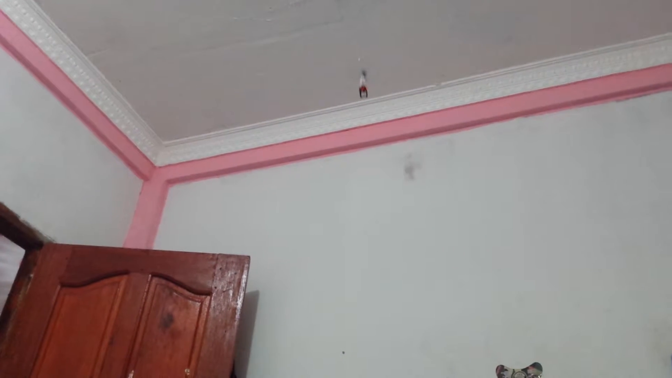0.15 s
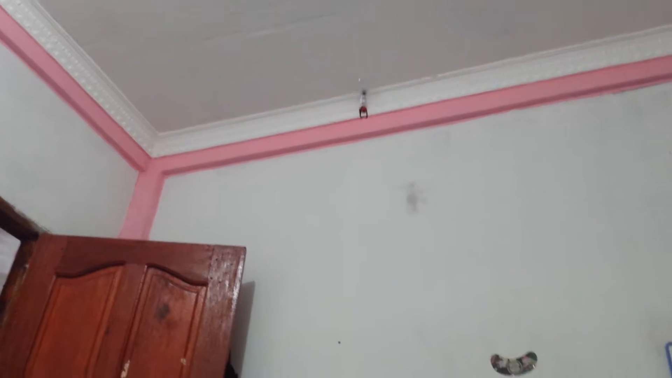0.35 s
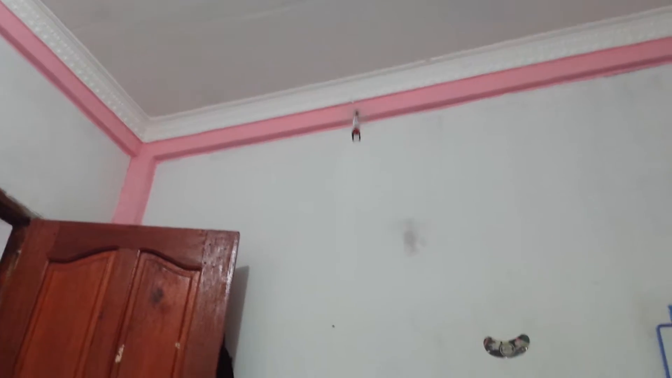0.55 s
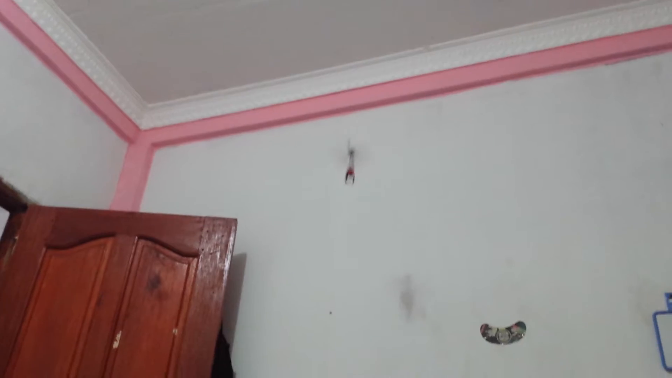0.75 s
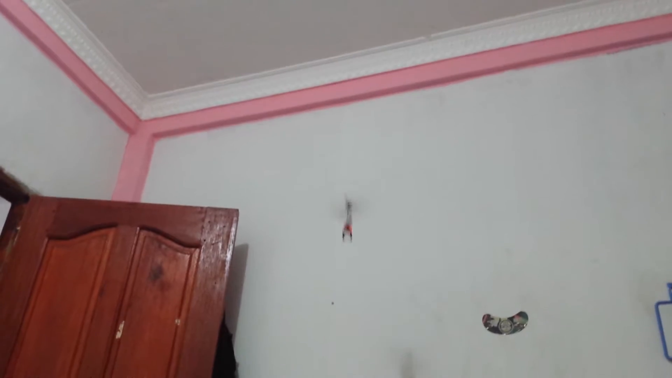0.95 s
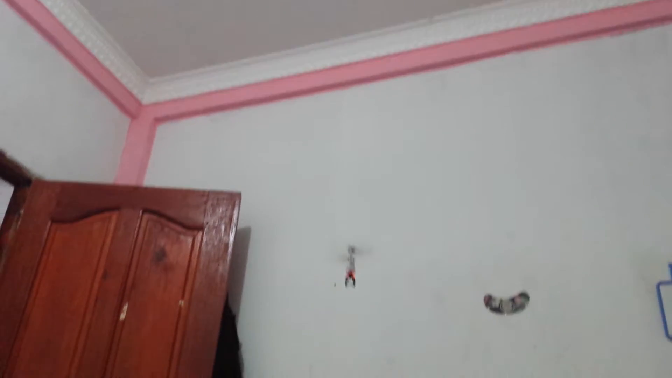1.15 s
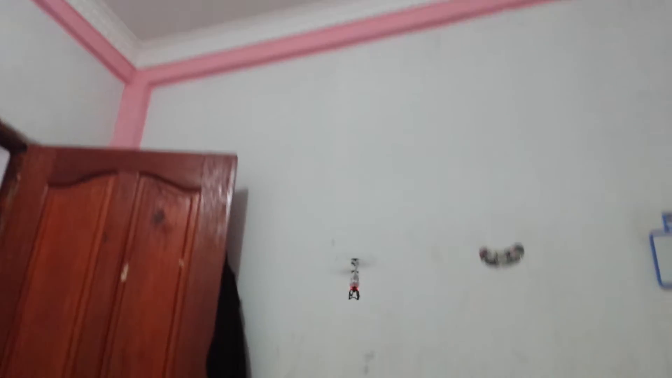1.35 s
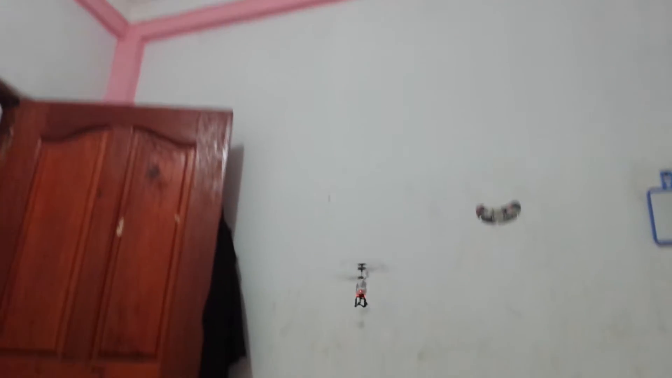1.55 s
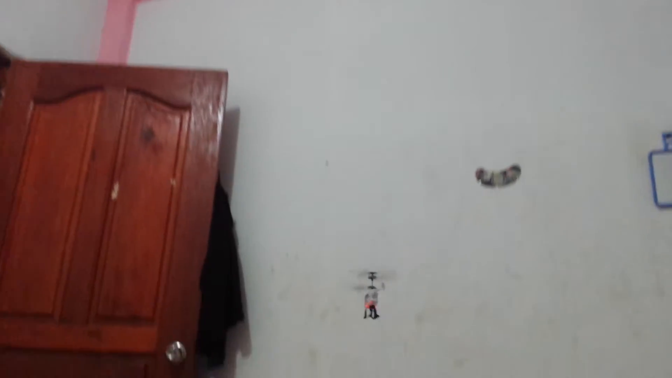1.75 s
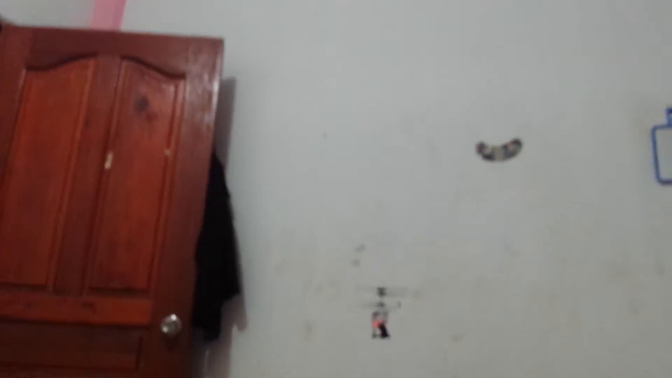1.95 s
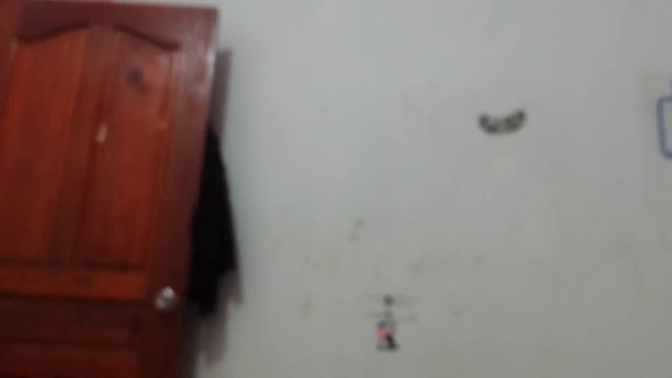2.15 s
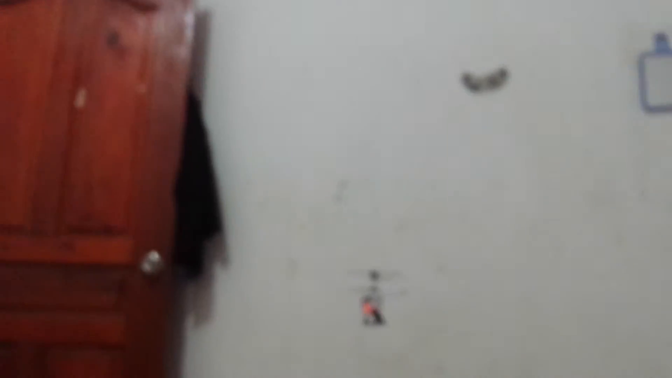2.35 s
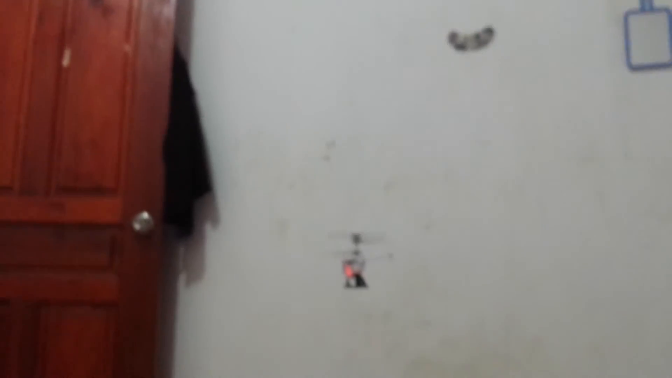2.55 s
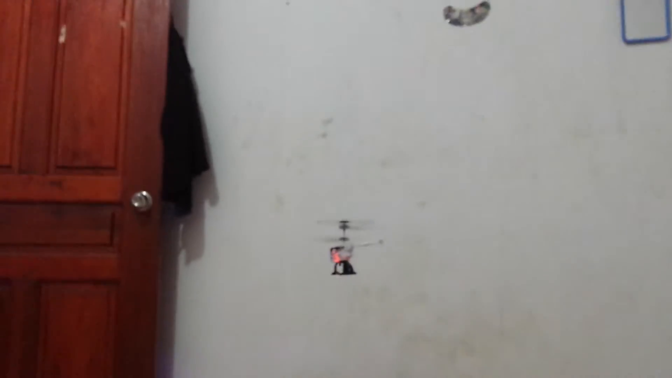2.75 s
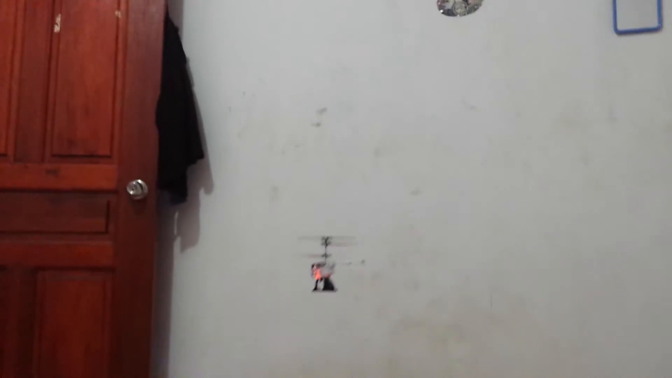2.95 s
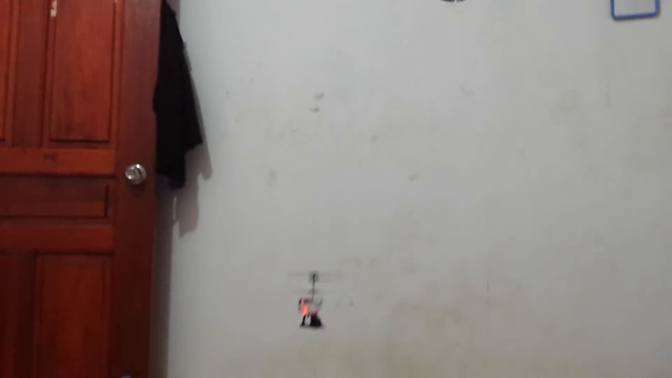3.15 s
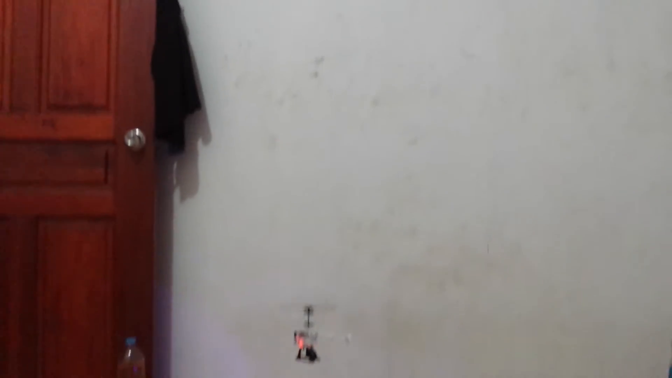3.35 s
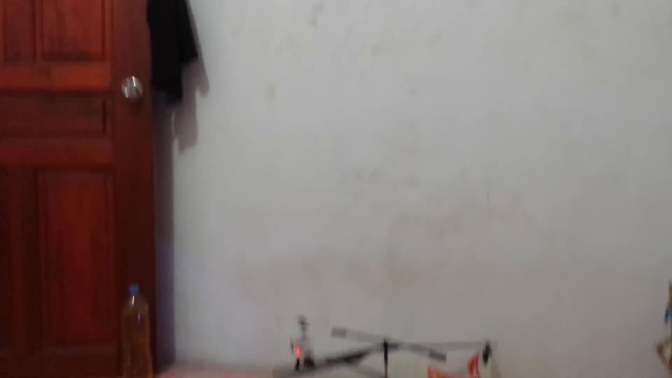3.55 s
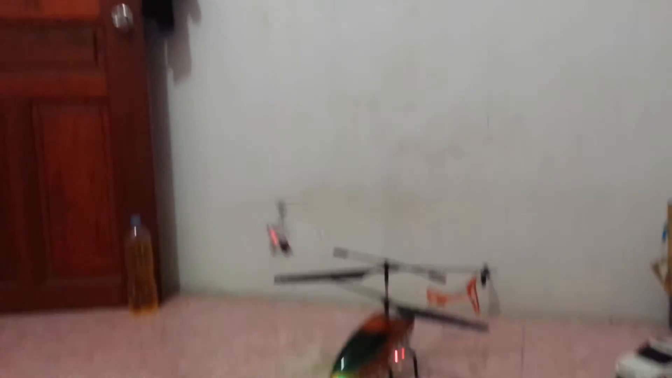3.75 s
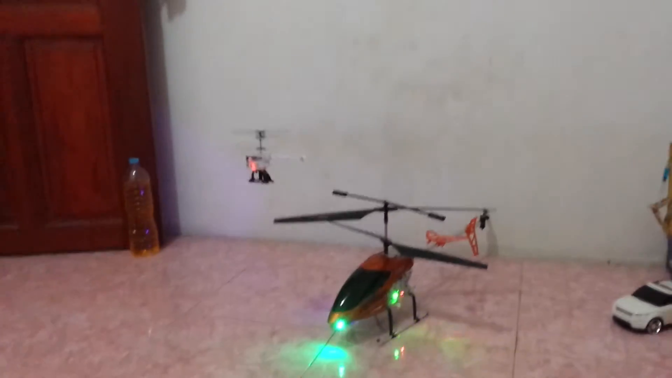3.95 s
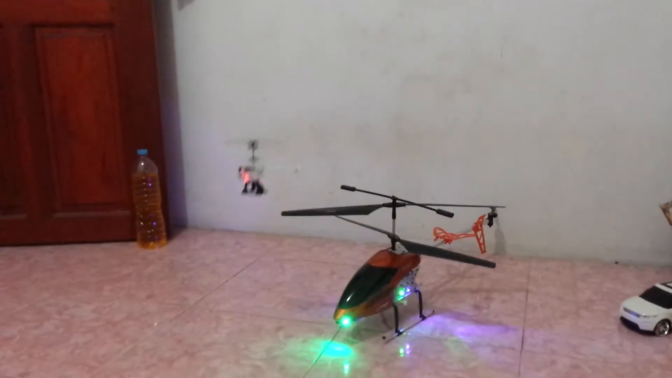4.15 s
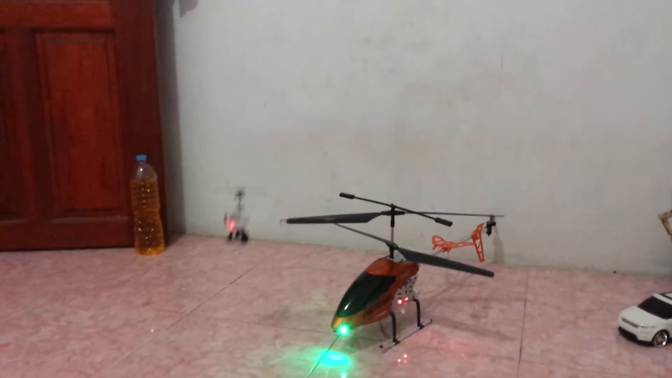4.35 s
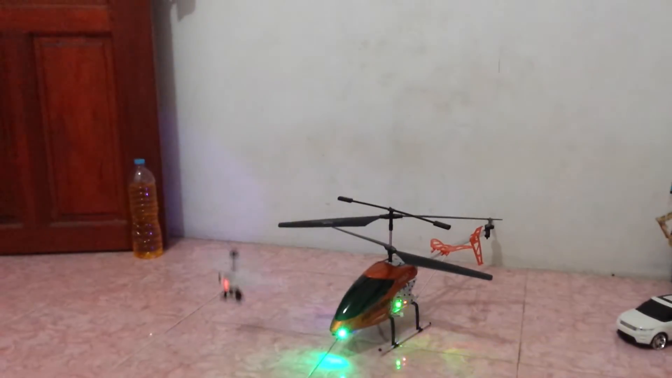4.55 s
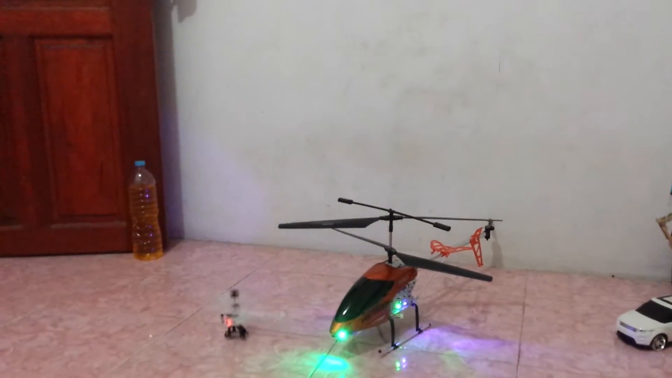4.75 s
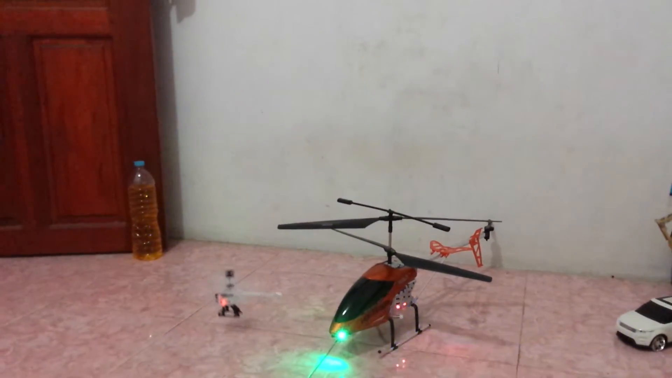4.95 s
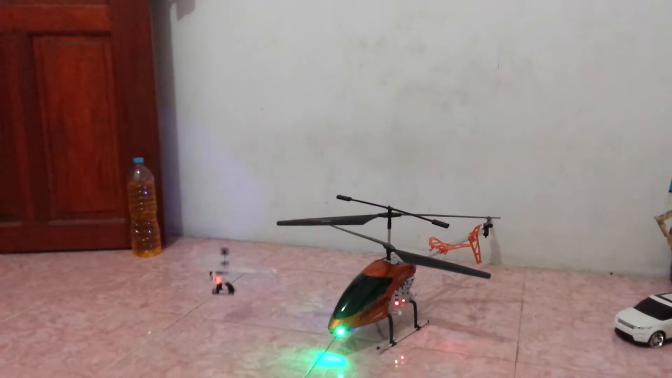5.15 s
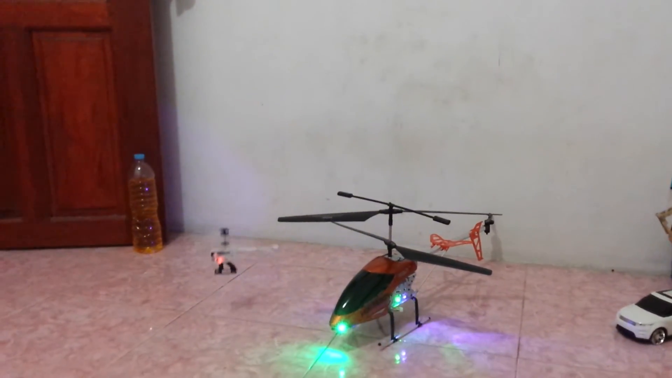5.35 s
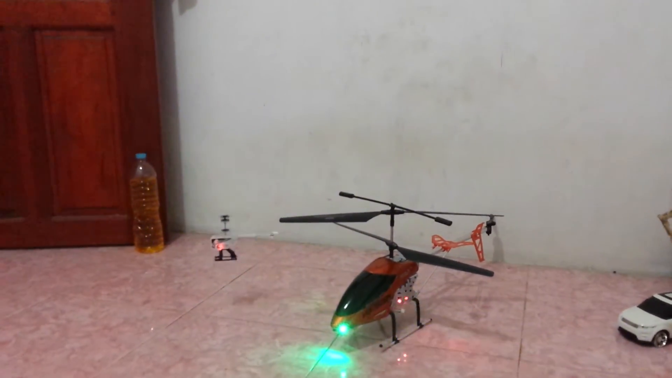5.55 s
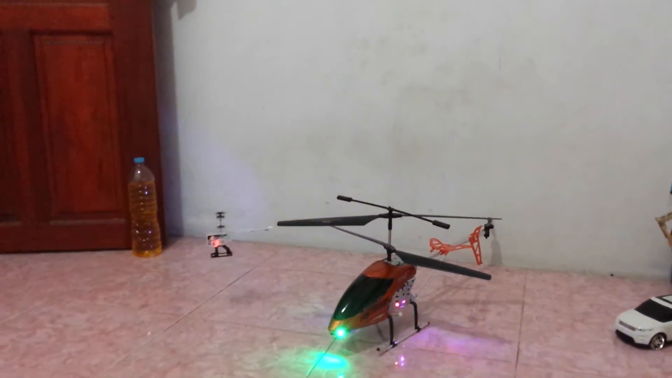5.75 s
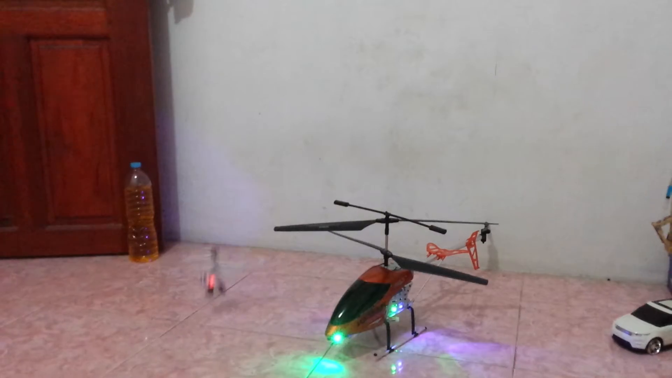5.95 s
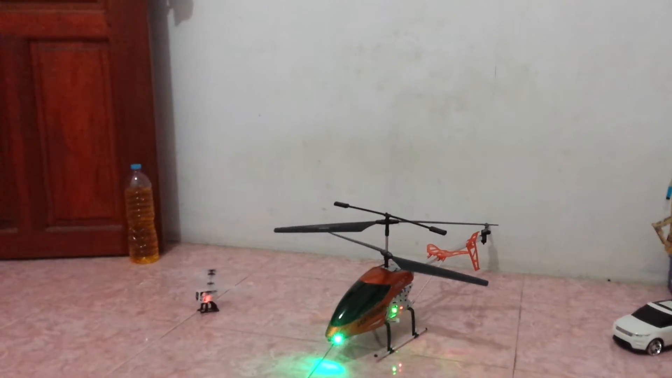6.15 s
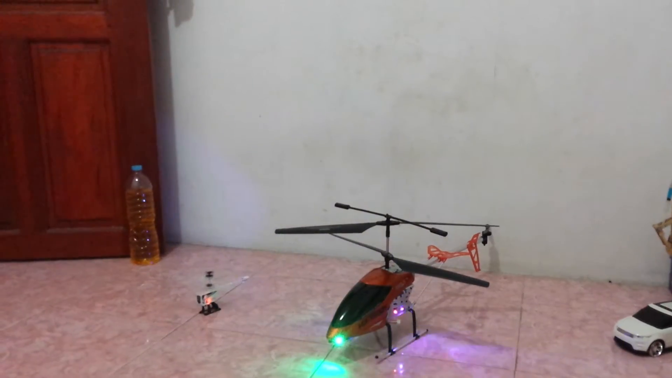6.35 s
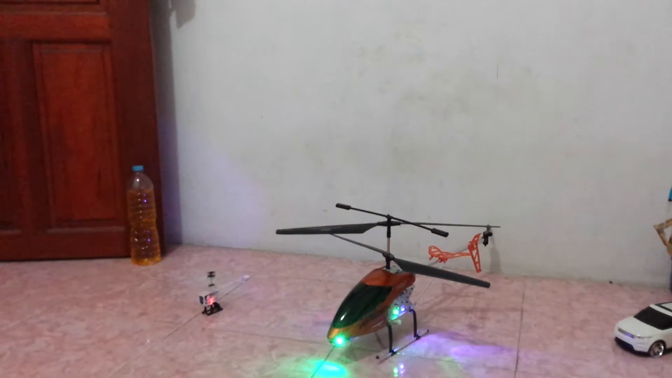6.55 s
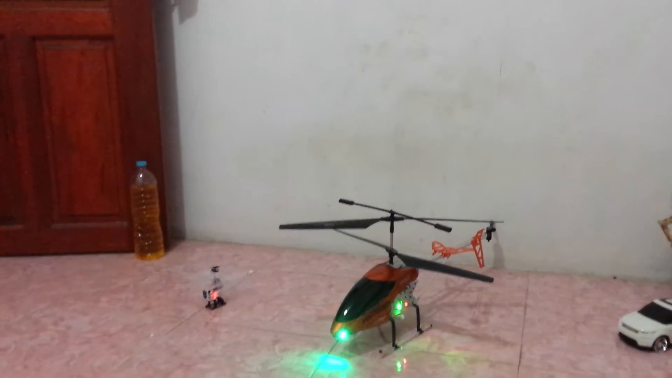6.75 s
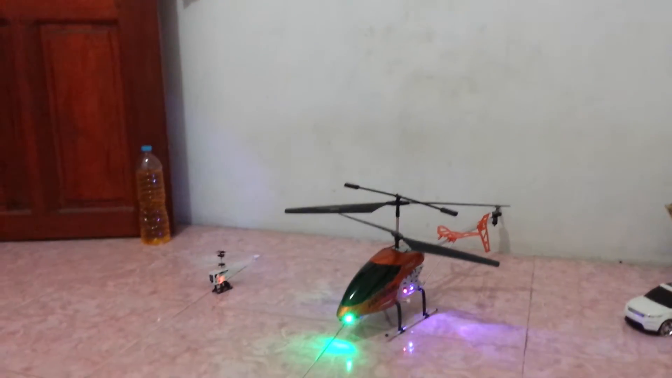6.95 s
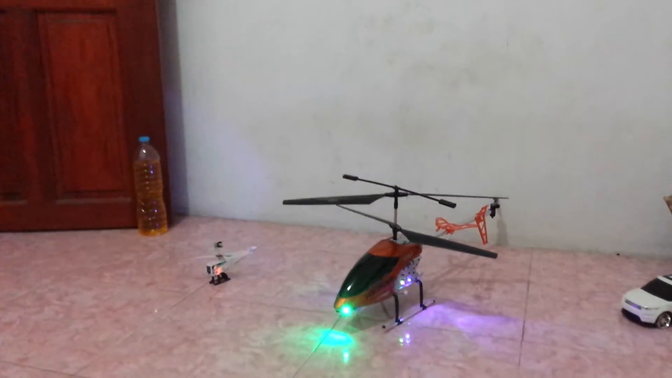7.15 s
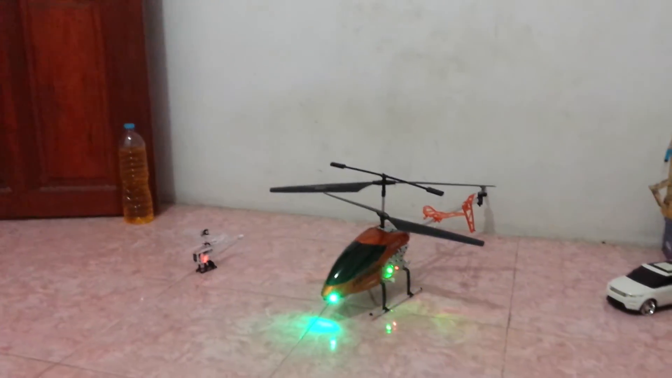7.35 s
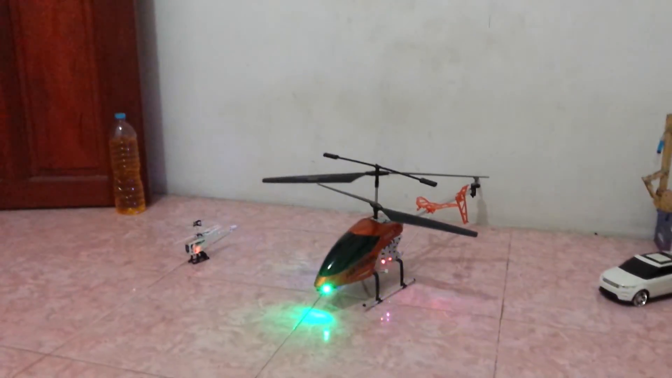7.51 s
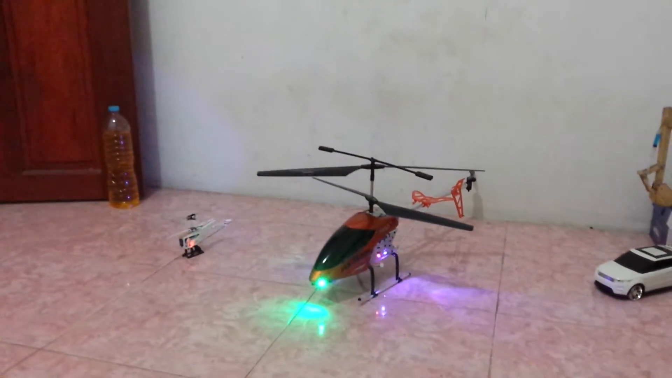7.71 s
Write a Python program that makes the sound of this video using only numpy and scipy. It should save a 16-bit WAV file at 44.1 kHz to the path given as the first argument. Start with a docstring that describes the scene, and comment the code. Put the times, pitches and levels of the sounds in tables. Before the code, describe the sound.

In a small, echoing tiled room, a tiny electric toy helicopter makes a dense, bright gear rattle with two wavering high whines and a faint blade hum. The pitch rises, sags, then rises again before the motor cuts. Skids clack sharply on tile at about six seconds. A thin whirr slows and fades while a distant engine grows outside. A plain stereo microphone in the room hears it all, with soft pings behind.

```python
"""A tiny toy helicopter with two rotors on one axis flies round a tiled room: gear teeth rattle its plastic body,
each gear mesh sings a gliding whine, and the blades hum over stirred air, all made from clicks, sines and noise.
A soft ping and a low drone come from the house along the way, and a distant engine starts to swell outside.
The motors are cut to a tick-over and the skids clack on the tiles; another soft ping sounds as
the motors whirr down under the engine. A two-port microphone with a limiter listens."""
import sys
import numpy as np
from scipy import signal
from scipy.fft import rfft, irfft, next_fast_len
from scipy.io import wavfile
from scipy.ndimage import uniform_filter1d, minimum_filter1d, map_coordinates

SR = 44100
rng = np.random.default_rng(int(sys.argv[2]) if len(sys.argv) > 2 else 0)


def generate_wav(signal):
    """Clip the signal to [-1, 1] and save it as 16-bit WAV at the path in sys.argv[1]."""
    frames = np.transpose(np.atleast_2d(signal))
    scaled = np.clip(frames, -1, 1) * 32767
    pcm = np.round(scaled).astype(np.int16)
    wavfile.write(sys.argv[1], SR, pcm)


N = 343083
T = np.arange(N) / SR  # time in seconds
DRIVE_HZ = 317  # pulse rate of the motor drive
TEETH_PER_TURN = 53  # teeth that pass in one rotor turn


def undb(db):
    """Turn decibels into a gain."""
    return 10 ** (np.asarray(db) / 20)


def curves(table):
    """Join each column of a table by straight lines in time, holding the end values."""
    s, *columns = np.transpose(table)
    return [np.interp(T, s, c) for c in columns]


def at(points, hz):
    """Read (Hz, value) points along a log-frequency axis."""
    f, value = np.transpose(points)
    return np.interp(np.log(hz + 1), np.log(f), value)


def unit(x):
    """Scale to an rms of 1."""
    return x / np.sqrt(np.mean(x ** 2))


def shape(x, gain):
    """Filter by a gain that is a function of frequency."""
    size = next_fast_len(N + 8192)
    f = np.arange(size // 2 + 1) * SR / size
    return irfft(rfft(x, size) * gain(f), size)[..., :N]


def below(f, hz, order=8):
    """Gain of a low-pass; one minus it is the matching high-pass."""
    return 1 / (1 + (f / hz) ** order)


def wander(hz):
    """Smooth random drift with spread 1, mostly slower than hz."""
    return unit(shape(rng.standard_normal(N), lambda f: below(f, hz, order=4)))


# How long the tiled room rings. Each row: frequency in Hz, time to fade by 60 dB in seconds.
ROOM_FADE = [(150, 0.75), (1000, 0.63), (3000, 0.6), (7000, 0.6), (14000, 0.66)]


def room(x, wet_db, width=1.):
    """Direct sound plus the room's noise-like tail, which changes as things move; alike at both ports in the bass."""
    hop, size = SR // 3, 2 ** 16  # each stretch of sound gets a fresh tail
    window = np.sin(np.pi * np.arange(2 * hop) / (2 * hop))
    padded, wet = np.pad(x, (hop, size)), np.zeros((2, N + hop + size))
    f = np.fft.rfftfreq(256, 1 / SR)[:, None]
    s = np.arange(SR * 3 // 4 // 128) * 128 / SR
    onset = np.clip((s - .002) / 0.0052, 0, 1)
    decay = undb(-60 * s / at(ROOM_FADE, f)) * onset
    for i in range(0, N + hop, hop):
        real, imaginary = rng.standard_normal((2, 2, *decay.shape))
        mid, side = decay * (real + 1j * imaginary)
        side = side * np.minimum(width * f / 800, 1)
        tail = signal.istft(np.array([mid + side, mid - side]))[1]
        tail = tail / np.sqrt(np.sum(tail ** 2) / 2)
        wet[:, i:i + size] += irfft(rfft(window * padded[i:i + 2 * hop], size) * rfft(tail, size))
    return (x + undb(wet_db) * wet[:, hop:hop + N]) / np.hypot(1, undb(wet_db))


def tooth_clicks(hz, scatter_db=4.5, late=0.305, throb_db=2.0):
    """One click a tooth, uneven in size and timing (late: spread in teeth), harder on each motor drive pulse."""
    teeth = np.cumsum(hz) / SR
    k = np.arange(2, int(teeth[-1]) - 2)
    chance = rng.standard_normal((len(k), 2))
    place = np.interp(k + late * chance[:, 0], teeth, np.arange(N))
    throb = throb_db * np.sin(2 * np.pi * DRIVE_HZ * place / SR)
    size = undb(scatter_db * np.minimum(chance[:, 1], 2) + throb)
    # spread each click over 8 samples so that it can fall between samples
    taps = place.astype(int)[:, None] + np.arange(-3, 5)
    weights = size[:, None] * np.sinc(taps - place[:, None])
    return np.bincount(np.clip(taps, 0, N - 1).ravel(), weights.ravel(), N)


def body_bands(clicks, colour):
    """Clicks ringing the plastic, split into canopy (low), motor (middle) and frame (high) bands of rms 1."""
    ring = shape(clicks, lambda f: undb(at(colour, f)) * (1 - below(f, 1040)))
    low = shape(ring, lambda f: below(f, 4470, order=16))
    under = shape(ring, lambda f: below(f, 7080, order=24))
    return unit(low), unit(under - low), unit(ring - under)


# Speed of the upper rotor's gears. Each row: time in seconds, tooth rate in Hz.
UPPER_SPEED = [(0.0, 2699), (0.3, 2699), (0.6, 2668), (0.84, 2688), (1.0, 2825), (1.1, 2875), (1.25, 2904),
               (2.0, 2847), (2.3, 2915), (2.47, 2910), (2.93, 2666), (3.6, 2579), (4.0, 2594), (4.48, 2563),
               (4.82, 2670), (5.35, 2716), (5.65, 2714), (5.9, 2668)]
# Speed of the lower rotor's gears. Each row: time in seconds, tooth rate in Hz.
LOWER_SPEED = [(0.3, 2596), (0.78, 2648), (1.08, 2866), (1.7, 2998), (2.05, 3037), (2.36, 3124),
               (2.94, 2748), (3.1, 2679), (3.4, 2645), (3.72, 2654), (4.03, 2728), (4.45, 2739),
               (4.8, 2914), (5.15, 2979), (5.58, 3001), (5.9, 2918)]
HOVER_HZ, CLIMB_HZ = 2583, 3047  # lower tooth rate at effort 0 and at effort 1


def effort():
    """How hard the motors work, read from the lower gear speed: 0 at hover, 1 in a climb."""
    return (curves(LOWER_SPEED)[0] - HOVER_HZ) / (CLIMB_HZ - HOVER_HZ)


# Tooth rattle along the flight path. Each row: time in seconds, level in dB before the room,
# lean to the left in dB (flight() centres and softens it).
RATTLE_PATH = [(0.0, -17.5, -4.5), (0.22, -21, -4), (1.25, -19.5, -3), (2.15, -19.5, -4.5),
               (2.38, -23, -6.5), (2.65, -22, -5.5), (3.65, -22.6, -6.5), (3.85, -20, -5.5),
               (5.8, -20.5, -5), (5.97, -21, -5.5), (6.05, -23.5, -4.5)]
# Extra gain as the rattle stops. Each row: time in seconds, gain in dB.
RATTLE_ENDING = [(6.09, -1.5), (6.2, -2.5), (6.4, -25)]
# How the body rings in flight, before its bands are levelled. Each row: frequency in Hz, gain in dB.
BODY_COLOUR = [(710, -62), (1200, -29), (1460, -26.5), (1880, -13), (2430, -8.5), (2620, -14), (2950, -8),
               (3900, -10), (4240, -8.5), (5550, -3), (7020, 1), (7900, 2.5), (10200, -11.5),
               (14400, -20.5), (15500, -24)]
# The frame's treble and its sharp resonance carry best when the helicopter is low. Each row: time in
# seconds, frame band against the rattle level in dB, resonance against that band in dB before a trim.
FRAME_CARRY = [(0, 1.7, -3), (2.4, 1.5, -17), (2.9, 3.5, -3.5), (5.6, 2, -9.5), (5.92, -2, -6)]
CANOPY_DB, CANOPY_EFFORT_DB = -3.0, -3  # canopy band against the rattle level at hover, change at effort 1


def rattle(follow=.6, ring_hz=7800, ring_width_hz=350):
    """Loose teeth ring the body; the motor band rises a little with speed and the canopy thins with effort."""
    upper_hz, lower_hz = curves(UPPER_SPEED)[0], curves(LOWER_SPEED)[0]
    frame_db, ring_db = curves(FRAME_CARRY)
    clicks = tooth_clicks(upper_hz) + tooth_clicks(lower_hz)
    canopy, motor, frame = body_bands(clicks, BODY_COLOUR)
    # play the motor band faster or slower to shift its pitch
    stretch = (upper_hz / np.mean(upper_hz)) ** follow
    motor = map_coordinates(motor, [np.cumsum(stretch)], order=3, mode="mirror")
    share = undb(ring_db)
    ring = unit(shape(frame, lambda f: below(f - ring_hz, ring_width_hz, order=2)))
    frame = (frame + share * ring) / (1 + 0.62 * share)  # trim for the added ring
    canopy_gain = undb(CANOPY_DB + CANOPY_EFFORT_DB * effort())
    body = canopy_gain * canopy + undb(3.0) * motor + undb(frame_db) * frame
    return undb(curves(RATTLE_PATH)[0] + curves(RATTLE_ENDING)[0]) * body


def mesh_phase(hz, backlash, slip_hz=260, wobble=0.27):
    """Phase of a gear mesh: it sways twice a rotor turn, and the teeth slip about in their backlash (radians)."""
    teeth = 2 * np.pi * np.cumsum(hz * (1 + 0.000743 * wander(15.0))) / SR
    rotor = teeth / TEETH_PER_TURN
    return teeth + wobble * np.sin(2 * rotor + wander(3.2)) + backlash * wander(slip_hz)


# The whines swell or dip as the helicopter crosses the room's standing waves. Each row: centre in seconds,
# length in seconds, gain of the upper whine in dB, gain of the lower whine in dB.
STANDING_WAVES = [(0.026, 0.12, 8, 4), (0.198, 0.14, 11.5, -5), (0.373, 0.11, 8, -5), (0.95, 0.18, 6, 2),
                  (1.88, 0.17, 7, -1.5), (2.382, 0.19, 8, -5), (2.921, 0.1, 7.5, -3.5), (4.1, 0.18, 8.5, 2),
                  (4.496, 0.17, 8, 4), (4.863, 0.21, 8, -2), (5.076, 0.098, 9, 0.5), (5.254, 0.24, -2, 4.5),
                  (5.55, 0.23, 6, 3.5)]
# levels at hover before swells and throttle, then their rise at effort 1
UPPER_DB, LOWER_DB, SIDEBAND_DB = -33.5, -39.5, -39
UPPER_EFFORT_DB, LOWER_EFFORT_DB, SIDEBAND_EFFORT_DB = 0, 6, 4


def whines(flutter_db=2.5):
    """Each mesh sings at its tooth rate, fluttering under the blades; the pulsed motor drive adds sidebands."""
    work, drive = effort(), 2 * np.pi * DRIVE_HZ * T
    swell_db = 0
    for centre, length, *gains_db in STANDING_WAVES:
        swell_db = swell_db + np.outer(gains_db, np.exp(-(2 * (T - centre) / length) ** 2))
    upper_swell, lower_swell = undb(swell_db)
    a = mesh_phase(curves(UPPER_SPEED)[0], backlash=0.27) + 0.31 * np.sin(drive)
    b = mesh_phase(curves(LOWER_SPEED)[0], backlash=0.54)
    upper = upper_swell * np.sin(a) + undb(0.5) * np.sin(2 * a) + undb(0.4) * np.sin(3 * a)
    lower = lower_swell * np.sin(b) + undb(4.0) * np.sin(2 * b + 0.23 * np.sin(drive))
    sidebands = lower_swell * np.sin(b + drive)
    sidebands = sidebands + undb(-5.5) * np.sin(b + 2 * drive) - undb(-6.5) * np.sin(b - drive)
    layers = [(upper, UPPER_DB + UPPER_EFFORT_DB * work),
              (lower, LOWER_DB + LOWER_EFFORT_DB * work),
              (sidebands, SIDEBAND_DB + SIDEBAND_EFFORT_DB * work)]
    return sum(tone * undb(db + flutter_db * wander(42)) for tone, db in layers)


# Air beaten by the blades. Each row: time in seconds, level of multiples below 5 in dB,
# level of the higher multiples in dB, both before the throttle.
BLADE_LEVELS = [(0.0, -68, -52), (0.75, -72, -52.5), (1.0, -51, -52), (1.6, -71.5, -61), (2.25, -50.5, -53),
                (2.5, -66, -63), (2.9, -58, -61), (3.9, -48, -55), (4.3, -42, -47), (4.6, -46.5, -48),
                (4.9, -58, -54), (5.6, -62, -58), (6.0, -47, -62)]
# Parts of the hum. Each row: multiple of the rotor's turning speed, gain in dB.
BLADE_PARTS = [(2, -15), (3, -3.5), (7, -17), (8, -13.5), (9, -9), (10, -16), (12, -14)]


def blades():
    """The blades beat the air: an unsteady hum on multiples of the upper rotor's turning speed."""
    low_db, high_db = curves(BLADE_LEVELS)
    turn = 2 * np.pi * np.cumsum(curves(UPPER_SPEED)[0]) / SR / TEETH_PER_TURN
    hum = 0
    for k, db in BLADE_PARTS:
        gain = undb(db + (low_db if k < 5 else high_db) + 3.0 * wander(5.5))
        hum = hum + gain * np.sin(round(k) * turn + 0.49 * wander(12.5))
    return hum


# Buzz of the pulsed motor drive. Each row: time in seconds, level in dB before the throttle.
BUZZ_LEVEL = [(0.4, -64), (1.0, -55), (2.05, -60.5), (2.35, -66), (4.4, -61), (5.2, -72)]


def drive_buzz():
    """The motor drive's pulses buzz at their own rate and, more softly, at twice that rate."""
    drive = 2 * np.pi * DRIVE_HZ * T
    return undb(curves(BUZZ_LEVEL)[0]) * (np.sin(drive) + undb(-11) * np.sin(2 * drive))


# Colour of the room's air noise. Each row: frequency in Hz, gain in dB.
AIR_COLOUR = [(15, -38), (25, -9.5), (92, -3), (134, 1.5), (236, -7.5), (321, -1), (537, -6), (637, -3),
              (1100, -6.5), (1500, -8), (1950, -37), (3300, -120)]
AIR_DB = -49  # before the downwash change


def air():
    """Room air stirred by the downwash: low noise that drifts in level and eases after landing."""
    downwash_db = np.interp(T, [6.1, 6.4], [1.5, -2.5])
    noise = shape(rng.standard_normal(N), lambda f: undb(at(AIR_COLOUR, f)) * below(f, 1560))
    return undb(AIR_DB + downwash_db + 1.16 * wander(2.9)) * unit(noise)


# Distant engine. Each row: time in seconds, level in dB before its two parts are balanced.
ENGINE_LEVEL = [(5.4, -58.5), (6.2, -51.5), (6.75, -57.5), (7.1, -44.5), (7.4, -42), (7.78, -42.5)]
# Tones of the engine's firing. Each row: frequency in Hz, gain in dB against the other tones.
ENGINE_TONES = [(133, -5), (177, -2), (222, -8.5), (266, -9), (317, -8.5), (363, -7), (570, -14),
                (947, -15), (1890, -10.5)]


def engine():
    """An engine outside, faint at first: unsteady firing tones over a noise rumble."""
    firing = 0
    for hz, db in ENGINE_TONES:
        gain = undb(db + 3.2 * wander(5.3))
        firing = firing + gain * np.sin(2 * np.pi * hz * T + 0.74 * wander(13))
    rumble = shape(rng.standard_normal(N),
                   lambda f: below(f, 217, order=1) * below(f, 2400) * (1 - below(f, 77)))
    return undb(curves(ENGINE_LEVEL)[0]) * (undb(1.5) * unit(firing) + undb(-3.0) * unit(rumble))


# Soft pings elsewhere in the house. Each row: start in seconds, frequency in Hz, level in dB before the room,
# time to fade by 60 dB in seconds.
HOUSE_PINGS = [(2.06, 972, -36, 0.23), (7.378, 513, -28.5, 0.087)]


def pings():
    """Each ping is one fading tone with a 5 ms rise."""
    total = 0
    for start, hz, db, t60 in HOUSE_PINGS:
        fade = undb(db - 60 * np.abs(T - start) / t60)
        rise = np.clip((T - start) / 0.0052, 0, 1)
        total = total + fade * rise * np.sin(2 * np.pi * hz * T)
    return total


# Low drone in the house. Each row: start in seconds, end in seconds, frequency in Hz, level in dB.
HOUSE_DRONE = [(2.55, 3.45, 56.2, -60), (4.6, 7.9, 62.3, -56.5)]
DRONE_FADE_S = 0.2  # each fade is centred on the start or end


def drone():
    """Steady low tones that fade in and out."""
    total = 0
    for start, end, hz, db in HOUSE_DRONE:
        fade = np.clip(np.minimum(T - start, end - T) / DRONE_FADE_S + .5, 0, 1)
        total = total + undb(db) * fade * np.sin(2 * np.pi * hz * T)
    return total


# How the body rings at tick-over, before its bands are levelled. Each row: frequency in Hz, gain in dB.
TICK_OVER_COLOUR = [(710, -49), (1200, -32), (1590, -18), (1760, -16.5), (2230, -8), (2740, -11.5),
                    (3010, -12.5), (4480, -14), (6170, 11), (7570, -6), (8150, -3.5), (10400, -13),
                    (11100, -11.5), (12900, -25), (15500, -24)]
# the whirr holds, then dies away under the hiss; levels are before the room
IDLE_START_S, IDLE_ATTACK_S, IDLE_HOLD_UNTIL_S = 6.0, 0.19, 7.11
IDLE_DB, IDLE_FADE_DB_PER_S = -33.5, 17.5
IDLE_HISS_DB, IDLE_HISS_FADE_DB_PER_S = -37, 2.5


def idle():
    """The unloaded gears tick over ever more slowly, ringing one narrow motor resonance."""
    db = IDLE_DB - IDLE_FADE_DB_PER_S * np.maximum(T - IDLE_HOLD_UNTIL_S, 0)
    hiss_db = IDLE_HISS_DB - IDLE_HISS_FADE_DB_PER_S * np.maximum(T - IDLE_START_S, 0)
    tooth_hz = np.interp(T, [6.1, 7.78], [2100, 1100])
    canopy, motor, frame = body_bands(tooth_clicks(tooth_hz, late=0.448), TICK_OVER_COLOUR)
    whirr = undb(db) * (motor + undb(-5.0) * frame) + undb(hiss_db) * canopy
    return whirr * np.clip((T - IDLE_START_S) / IDLE_ATTACK_S, 0, 1)


# Skids hitting the tiles. Each row: start in seconds, level in dB before a shared cut.
SKID_HITS = [(6.1203, 12.5), (6.1224, -5), (6.146, -9), (6.178, -16)]
# Ringing tones of a hit. Each row: frequency in Hz, gain in dB, time to fade by 60 dB in seconds.
SKID_TONES = [(140, -41, 0.4), (285, -38, 0.12), (2330, -16.5, 0.031), (2610, -20, 0.033),
              (8180, -16, 0.014), (8860, -8, 0.0054)]
# Colour of the noisy crack in a hit. Each row: frequency in Hz, gain in dB.
CRACK_COLOUR = [(410, -49), (700, -21), (1250, -12), (1540, -11), (2280, -1.5), (3320, -6.5), (5860, -15),
                (6500, 1), (14500, -14.5), (15500, -29)]


def landing(crack_db=3, crack_t60=0.018):
    """The skids clack on the tiles, bounce and settle: each hit is fading tones plus a short noise crack."""
    rings, cracks = np.zeros((2, N))
    s = T[:SR // 8]
    for start, db in SKID_HITS:
        span = slice(int(start * SR), int(start * SR) + len(s))
        for hz, gain_db, t60 in SKID_TONES:
            rings[span] += undb(db + gain_db - 60 * s / t60) * np.sin(2 * np.pi * hz * s)
        cracks[span] += undb(db + crack_db - 60 * s / crack_t60) * rng.standard_normal(len(s))
    cracks = shape(cracks, lambda f: undb(at(CRACK_COLOUR, f)))
    return room(undb(-6.0) * (rings + cracks), wet_db=0.5)


# Motor power as the throttle is shut. Each row: time in seconds, gain in dB.
THROTTLE_GAIN = [(5.8, 6), (5.9, -8), (6.1, -20), (6.3, -65)]


def flight():
    """The helicopter's sounds fill the room; the rattle leans left or right with the flight path."""
    pan_db, throttle = curves(RATTLE_PATH)[1], undb(curves(THROTTLE_GAIN)[0])
    sides = undb(np.array([[1], [-1]]) * (pan_db - np.mean(pan_db)) * 0.4)
    gears = sides * room(rattle() + idle(), wet_db=12.5)
    singing = room(whines() * throttle, wet_db=0.0)
    rotors = room((blades() + drive_buzz()) * throttle, wet_db=-6.5)
    return gears + singing + rotors


def house():
    """Air, engine and pings spread through the room; the drone reaches both ports alike."""
    return room(air() + engine() + pings(), wet_db=1.5, width=1.12) + drone()


def scene():
    """Everything in the room."""
    return flight() + landing() + house()


# Colour of the two microphone ports. Each row: frequency in Hz, left minus right in dB.
PORT_TILT = [(200, -1), (1000, -1.6), (1900, -5.5), (2700, -5.5), (3600, -2), (4600, -1), (5400, 3.5),
             (6200, -1), (7000, -13), (7800, -13.5), (9500, -10.5), (12000, -7), (15000, -11.1)]
TOP_HZ = 15500  # nothing much is heard above this


def record(dry, ceiling=0.81, reach_s=0.026):
    """Each port has its own colour; a look-ahead limiter ducks round the loudest peaks; the top is cut."""
    def ports(f):
        tilt = undb(at(PORT_TILT, f))
        return np.array([tilt, np.ones_like(tilt)]) * np.sqrt(2 / (1 + tilt ** 2))
    x = shape(dry, ports)
    size = int(reach_s * SR)
    need_db = 20 * np.log10(ceiling / np.maximum(np.abs(x).max(axis=0), ceiling))
    x = x * undb(uniform_filter1d(minimum_filter1d(need_db, size), size))
    return signal.sosfilt(signal.ellip(10, .2, 80, TOP_HZ, fs=SR, output="sos"), x)


dry = scene()
out = record(dry)
generate_wav(out)
```